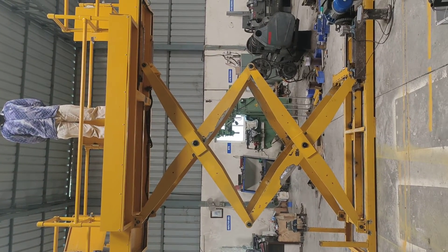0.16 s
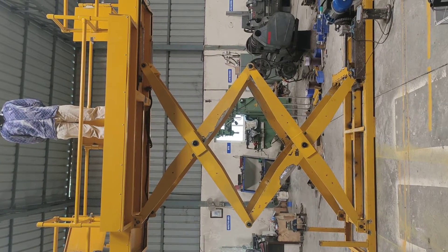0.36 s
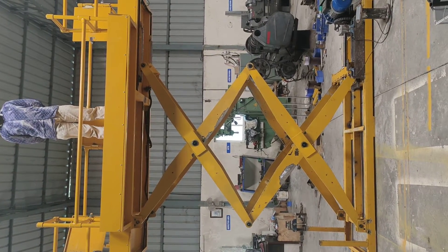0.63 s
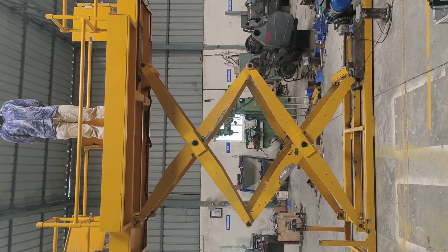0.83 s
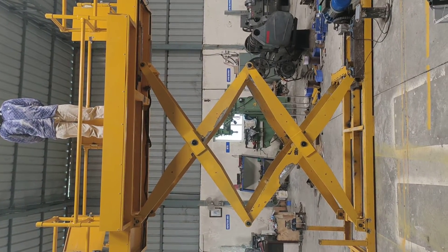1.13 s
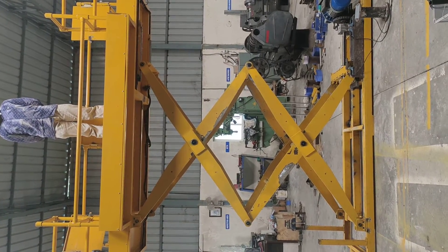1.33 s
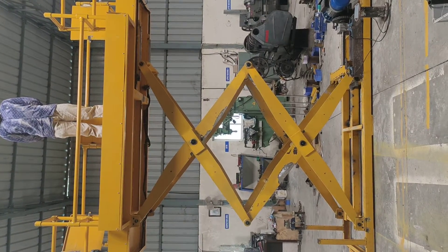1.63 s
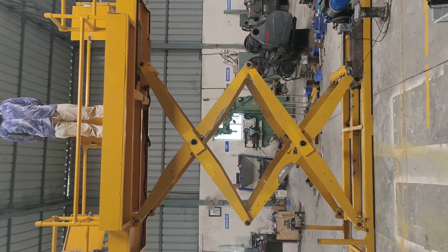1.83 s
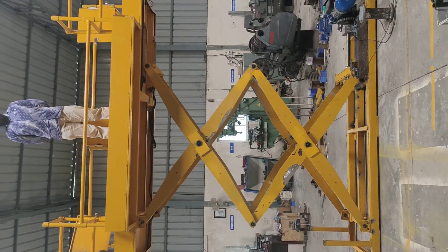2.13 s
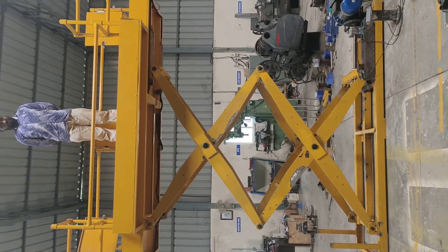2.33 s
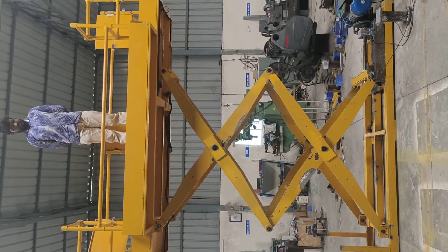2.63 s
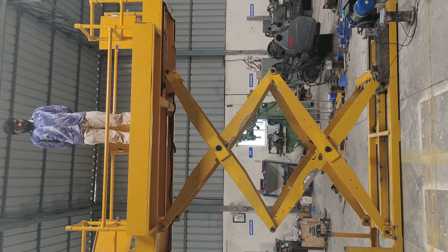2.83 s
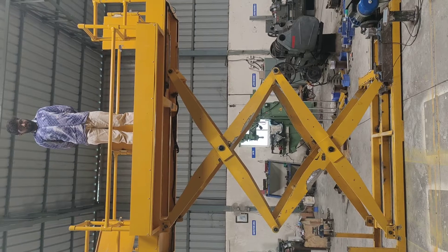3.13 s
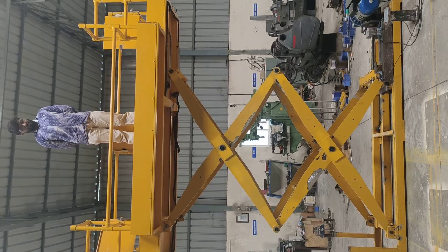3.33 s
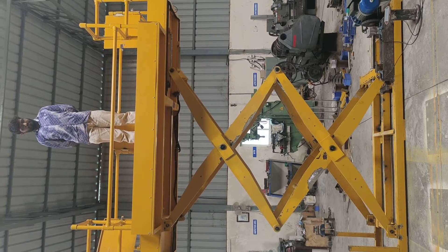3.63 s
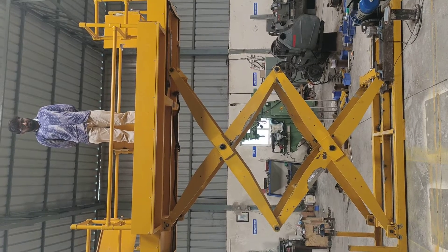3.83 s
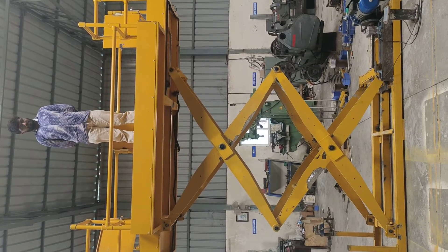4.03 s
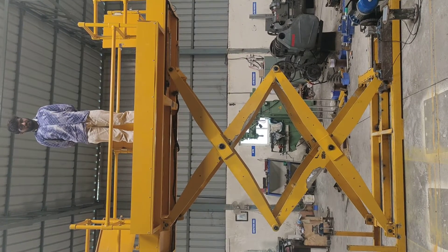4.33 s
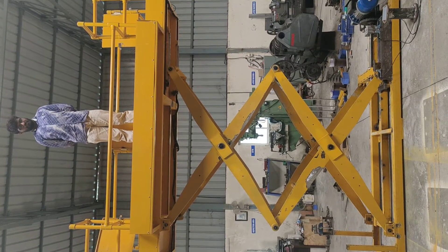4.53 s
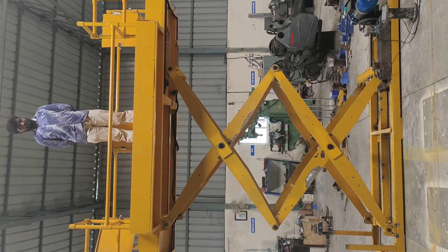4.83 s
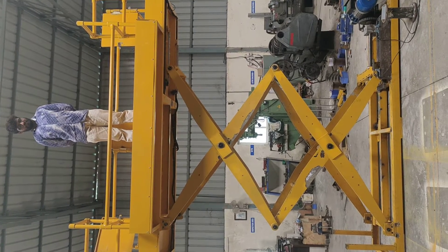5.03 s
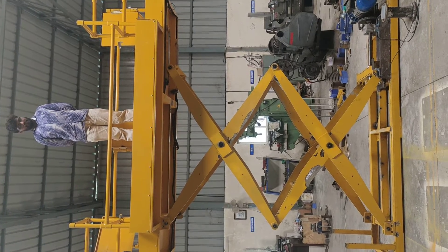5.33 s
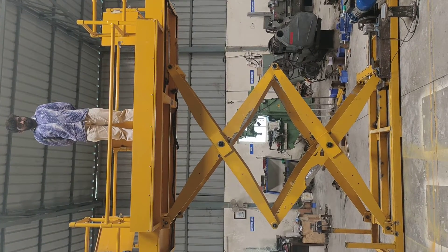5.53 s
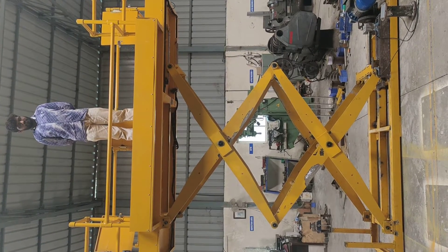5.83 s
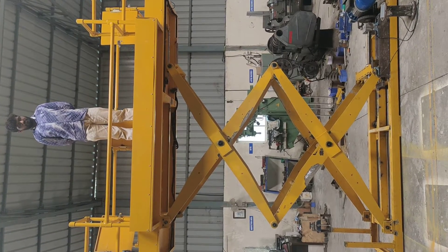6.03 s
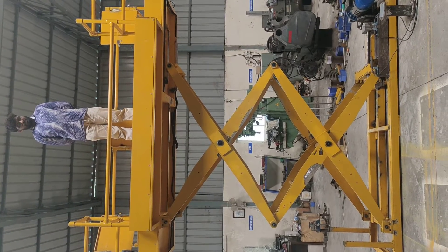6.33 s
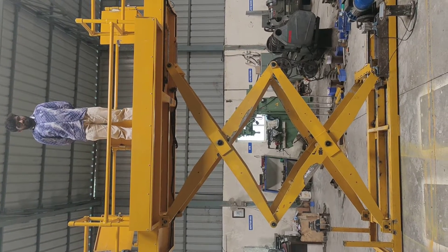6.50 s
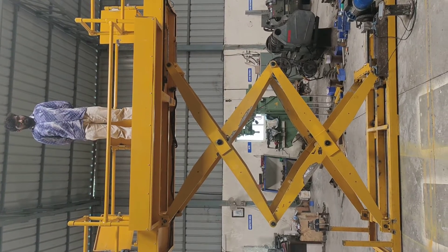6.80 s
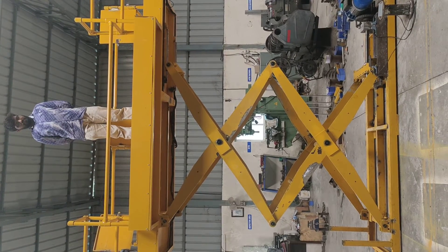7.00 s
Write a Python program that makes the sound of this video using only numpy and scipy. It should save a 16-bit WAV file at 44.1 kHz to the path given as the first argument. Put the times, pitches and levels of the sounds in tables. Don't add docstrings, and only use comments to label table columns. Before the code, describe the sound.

In a large, reverberant steel workshop, distant machinery rumbles softly. After a bit over a second a sharp metallic clack rings through the hall, and an electric motor quickly spins up with a rush of oil. It runs on with a high gear whine over airy hiss. Thin chirps, small joint ticks and dry squeaks come later. Stereo microphone a few metres away.

```python
import sys
import numpy as np
from scipy import signal
from scipy.fft import rfft, irfft, next_fast_len
from scipy.io import wavfile
from scipy.ndimage import uniform_filter1d, map_coordinates

SR = 44100
rng = np.random.default_rng(int(sys.argv[2]) if len(sys.argv) > 2 else 0)


def int16_out(signal):
    q = np.round(np.clip(np.atleast_2d(signal).T, -1, 1) * 32767)
    wavfile.write(sys.argv[1], SR, q.astype(np.int16))


def ratio_of_db(decibels):
    return 10 ** (np.asarray(decibels, float) / 20)


N = 315756
SIZE = next_fast_len(N + 2 * SR)
HZ = np.maximum(np.arange(SIZE // 2 + 1) * SR / SIZE, 1)
TIME = np.arange(N) / SR


def rms_one(x):
    return x / np.sqrt(np.mean(x ** 2) + 1e-20)


def at_hz(points, hz):
    table_hz, values = np.array(points).T
    return np.interp(np.log(hz), np.log(table_hz), values)


def coarse_drift(rate, size=N):
    points = rng.standard_normal(int(size / SR * 400) + 8)
    seconds = np.arange(size // 32 + 2) * 32 / SR
    return map_coordinates(points, [seconds * np.clip(rate, 0, 399) + 2], order=3)


def fine(coarse, size=N):
    return np.interp(np.arange(size) / 32, np.arange(len(coarse)), coarse)


def drift(rate, size=N):
    return fine(coarse_drift(rate, size), size)


def ports(pair):
    # f/Hz, left-right correlation
    likeness = [(60, .996), (130, .985), (210, .94), (330, .7), (560, .22), (1170, -.3), (2740, .42),
                (6400, 0)]
    # f/Hz, left-right level/dB
    port_lean = [(60, 0), (300, -.4), (700, 0), (1290, -2.5), (2380, -5.5), (4400, -4.5), (8120, -2),
                 (15000, -1.5)]
    alike = np.clip(at_hz(likeness, HZ), -1, 1)
    half_db = at_hz(port_lean, HZ) / 2
    mid = np.sqrt(1 + alike) * pair[0]
    side = np.sqrt(1 - alike) * pair[1]
    left, right = (mid + side) * ratio_of_db(half_db), (mid - side) * ratio_of_db(-half_db)
    return irfft(np.array([left, right]), SIZE)[:, :N]


def noise(gain):
    return rms_one(ports(rfft(rng.standard_normal((2, SIZE))) * gain))


def causal(gain):
    cepstrum = irfft(np.log(gain), SIZE)
    cepstrum[1:SIZE // 2] *= 2
    cepstrum[SIZE // 2 + 1:] = 0
    return np.exp(rfft(cepstrum))


def ring(clicks, hz, t60):
    r, w = ratio_of_db(-60 / (t60 * SR)), 2 * np.pi * hz / SR
    return signal.lfilter([0, np.sin(w)], [1, -2 * r * np.cos(w), r * r], clicks + 1e-18)


def far_machines():
    # f/Hz, level/dB per Hz
    rumble_colour = [(20, -46), (64, -2), (130, -8), (175, -5.5), (300, -9.5), (600, -16.5), (880, -16),
                     (1450, -28.5), (2400, -19.5), (3400, -26.5), (4150, -32.5), (4800, -27), (6300, -34.5),
                     (9500, -53.5), (15500, -52.5)]
    return ratio_of_db(-33) * noise(ratio_of_db(at_hz(rumble_colour, HZ)))


def hall_tail(x, build_s):
    # f/Hz, t60/s
    hall_t60 = [(250, 1.09), (700, 1.82), (2000, 1.8), (5000, 2.05), (8000, 1.1), (14000, 0.83)]
    t, tail = np.arange(2 * SR) / SR, 0
    edges = 100 * 2 ** np.arange(0, 7.6, .5)
    white = rng.standard_normal((2, 2, len(t)))
    for k, (low, high) in enumerate(zip(edges, edges[1:])):
        half_octave = signal.butter(2, [low, high], "band", fs=SR, output="sos")
        band = signal.sosfilt(half_octave, white[k % 2])
        tail = tail + band * ratio_of_db(-60 * t / at_hz(hall_t60, np.sqrt(low * high)))
    build_up = 1 - np.exp(-t / build_s)
    return ports(rfft(tail * build_up, SIZE) * rfft(x, SIZE))


def joint_ticks():
    # t/s, peak level/dB, ring f/Hz, width/Hz
    joint_snaps = [
        (3.461, -38, 15000, 2500),
        (3.508, -25, 11500, 9000),
        (3.509, -24, 4800, 450),
        (3.534, -20, 4900, 550),
        (4.851, -25, 14600, 4000),
        (4.977, -29, 14200, 4000),
    ]
    out = np.zeros(N)
    t = np.arange(SR // 20) / SR
    for s, db, hz, width_hz in joint_snaps:
        t60 = 1.6 / width_hz
        burst = rng.standard_normal(len(t)) * np.exp(-t / .0015)
        snap = ring(ring(burst, hz, t60), hz, t60)
        out[round(s * SR):][:len(t)] += ratio_of_db(db) * snap / np.abs(snap).max()
    return out


def slip(row, overtones_db):
    s, length, hz, db, scatter = row
    t = np.arange(round(length * SR)) / SR
    pitch = hz + scatter * (drift(121, len(t)) - 2.5 * t)
    phase = 2 * np.pi * np.cumsum(pitch) / SR
    flutter_db = min(0.46 * scatter, 4.0)
    wave = 0
    for k, partial_db in enumerate(overtones_db):
        rough_loss_db = 0.029 * scatter if k == 0 else 0
        level_db = partial_db - rough_loss_db + flutter_db * drift(61.7, len(t))
        wave = wave + ratio_of_db(level_db) * np.sin((k + 1) * phase)
    shape_db = np.interp(t / length, [0, 0.17, 0.17 + 0.38, 1], [-2, 0, 0, -19])
    fade = np.clip(np.minimum(t, length - t) / 0.023, 0, 1)
    out = np.zeros(N)
    out[round(s * SR):][:len(t)] = wave * fade * ratio_of_db(db + shape_db)
    return out


def dry_pins():
    # t/s, length/s, slip rate f/Hz, peak level/dB, pitch scatter/Hz
    squeal_rows = [
        (4.886, 0.51, 4660, -56, 50),
        (4.998, 0.17, 4680, -52.5, 25),
        (5.068, .24, 4950, -51, 89),
        (5.232, 0.4, 4756, -41, 13.6),
        (5.52, .7, 4745, -51, 32),
        (6.0, .2, 5220, -54, 23),
        (6.09, 0.4, 5010, -47, 26),
        (6.282, .28, 5240, -55, 50),
        (6.35, 0.62, 4680, -55.5, 45),
        (6.498, .27, 4800, -56, 52),
    ]
    partials_db = [5.5, -6, 0.5]
    # t/s, length/s, f/Hz, peak level/dB, pitch scatter/Hz
    chirp_rows = [
        (1.98, .72, 4000, -48.5, 2),
        (2.66, .64, 9810, -58, 40),
        (3.98, .44, 8820, -53, 35),
        (4.08, .36, 8610, -56, 45),
    ]
    squeals = sum(slip(row, partials_db) for row in squeal_rows)
    return squeals + sum(slip(row, [0]) for row in chirp_rows)


def gears(gearbox, whine):
    mesh_rates = [708.3, 2000.1, 2239.6, 2268.2]
    # shaft turns from the mesh, level/dB rms
    mesh_sidebands = [
        [(-1, -42), (0, -41.5), (1, -41.5)],
        [(0, -38.5)],
        [(-16, -53), (-15, -52), (-13, -51), (-11, -51), (-10, -52), (-2, -47), (-1, -42), (0, -38.5), (1, -41),
         (2, -43), (5, -50), (8, -50), (9, -55)],
        [(-27, -54), (-26, -56), (-16, -49), (-13, -53), (-3, -46), (-2, -43), (-1, -46), (0, -34), (1, -35),
         (2, -46), (3, -40), (4, -51), (6, -53)],
    ]
    # left-right level/dB, right lag/rad, growth/dB per s
    mesh_place = [(-9, -1, 0), (6.5, -2.04, 2.5), (-4, -1.5, -0.5), (-3, -0.75, 0)]
    shaft_hz = 39.06
    tones, slow = np.zeros((2, N)), slice(0, N, 32)
    for mesh_hz, sidebands, (pan_db, lag, growth_db) in zip(mesh_rates, mesh_sidebands, mesh_place):
        growth = ratio_of_db(growth_db * (TIME[slow] - TIME[-1]))
        for turns, db in sidebands:
            hz = mesh_hz + turns * shaft_hz
            start, pan, skew = rng.standard_normal(3)
            if hz < 2010:
                level = gearbox[slow] * ratio_of_db(42 if hz < 800 else 38)
            else:
                level = whine[slow] * ratio_of_db(30)
            shared = coarse_drift(7) * min(hz / 2000, 1)
            path = fine(1.2 * coarse_drift(1.2))
            turn = 2 * np.pi * (hz * TIME + start) + path
            turn = (turn % (2 * np.pi)).astype(np.float32)
            for side in (0, 1):
                place_db = (1 - side) * (pan_db + 3 * pan)
                sway = ratio_of_db(db + place_db + 3.0 * shared + 0.61 * coarse_drift(2.93))[:len(level)]
                side_lag = np.float32(side * (lag + 0.46 * skew))
                tones[side] += fine(growth * level * sway) * np.sin(turn + side_lag)
    return tones


def motor():
    # t/s, level/dB
    effort = [(1.55, -29), (1.75, -29), (2.2, -24), (2.602, -26), (3.8, -28.5), (4.1, -26), (4.8, -31.5),
              (5.2, -26.5), (7.16, -26)]
    # f/Hz, level/dB per Hz
    casing_colour = [(300, -14.5), (450, -12.5), (740, -15), (1450, -22), (2030, -13.5), (2290, -11.5),
                     (2600, -13), (3570, -27), (4600, -25.5), (5900, -9), (7000, -27.5), (8300, -30.5),
                     (10500, -49.5), (12500, -40.5)]
    # f/Hz, width/Hz, level/dB
    whistles = [(5200, 20, -60.5), (5690, 38, -45), (5772, 31, -43), (5980, 30, -58), (5660, 18, -63.5),
                (5800, 25, -78), (2266, 132, -40)]
    s, whine_db = np.transpose(effort)
    running = np.maximum(TIME - s[0], 0)
    start = np.clip(running / 0.17, 0, 1)
    whine = start * ratio_of_db(np.interp(TIME, s, whine_db))
    gearbox = start ** 2 * ratio_of_db(-41.5 + 1.5 * running)
    surge_db = 7.5 * np.exp(-running / 0.24)
    hiss = start * ratio_of_db(-38.5 + 0.49 * running + surge_db)
    peaks = 0
    for hz, width_hz, db in whistles:
        peaks = peaks + ratio_of_db(db) ** 2 / width_hz / (1 + (2 * (HZ - hz) / width_hz) ** 4)
    casing = ratio_of_db(5.5) * noise(ratio_of_db(at_hz(casing_colour, HZ))) * ratio_of_db(0.56 * drift(7.9))
    airy = ratio_of_db(2.5) * noise(np.sqrt(peaks)) * ratio_of_db(0.6 * drift(25))
    return gears(gearbox, whine) + hiss * (casing + airy)


def brake():
    # t/s, peak level/dB, weight (extra level of the low modes)/dB
    blows = [
        (1.348, -24, -22),
        (1.3544, -5.5, -32),
        (1.3647, 0, -9.5),
        (1.373, -8.5, 6),
        (1.387, -6, -15),
    ]
    # f/Hz, level/dB, t60/s
    frame_modes = [(320, -43, 0.13), (348.3, 2.5, 0.18), (361, -10.5, 0.2), (451, -5.5, 0.17),
                   (478, -7.5, 0.17), (887, -16, .1), (931, -7, 0.084), (964, -13, 0.1), (1078, -9, 0.07),
                   (1118, -4.5, 0.097), (1140, -25, .1), (1950, -19, 0.12), (2820, -12.5, 0.2),
                   (2660, -21, .1), (3219, -36, .1), (3210, -17, 0.13), (3714, -49, .1),
                   (4080, -11.5, 0.17), (4760, -8, .14), (5130, -14, .12), (5240, -3.5, 0.13),
                   (5360, -5, 0.072), (7600, -3, 0.021)]
    # f/Hz, level/dB per Hz
    crack_colour = [(200, -40), (340, -3), (450, -4.5), (560, -15), (900, -11.5), (1120, -9), (1450, -19.5),
                    (1910, -13.5), (3310, -13), (4350, -18.5), (5170, -7), (6300, -15), (10000, -27),
                    (13500, -22.5)]
    s, db, weight_db = np.transpose(blows)
    at = np.round(s * SR).astype(int)
    burst, click, frame = np.zeros((3, N))
    for start, level in zip(s, ratio_of_db(db)):
        burst += level * (TIME >= start) * np.exp(-np.maximum(TIME - start, 0) / 0.0042)
    click[at[2]] = ratio_of_db(10.5)
    sources = [burst * rng.standard_normal(N), click]
    crack = causal(ratio_of_db(at_hz(crack_colour, HZ)))
    rattle, thump = irfft(rfft(sources, SIZE) * crack, SIZE)[:, :N]
    ringing = slice(at[0], at[0] + SR // 2)
    for hz, mode_db, t60 in frame_modes:
        clicks = np.zeros(N)
        clicks[at] = ratio_of_db(db + mode_db + weight_db * (hz < 600) + rng.normal(0, 2.4, len(at)))
        frame[ringing] += ring(clicks[ringing], hz, min(t60, .16))
    near = ratio_of_db(17.5) * rattle + ratio_of_db(-11.5) * frame
    far = ratio_of_db(24.0) * thump + ratio_of_db(-13.5) * frame
    return near, far


def scene():
    squeals, snaps = dry_pins(), joint_ticks()
    blow, far_blow = brake()
    direct = ratio_of_db(-4.5) * blow + ratio_of_db(3.0) * snaps
    near = np.array([np.roll(direct, 10), direct]) * ratio_of_db([[-1.2], [1.2]])
    pins = ratio_of_db(-1.5) * squeals * ratio_of_db([[1.5], [-1.5]])
    to_hall = ratio_of_db(-32) * far_blow + ratio_of_db(-40.5) * snaps + ratio_of_db(-36.5) * squeals
    return near + pins + hall_tail(to_hall, build_s=0.002) + motor() + far_machines()


def band_limit(x):
    return signal.sosfilt(signal.butter(12, 15700, fs=SR, output="sos"), x)


def record(dry):
    level_db = 10 * np.log10(uniform_filter1d(np.mean(dry ** 2, axis=0), 1024) + 1e-12)
    release_db = 6.8 * TIME
    held_db = np.maximum.accumulate(level_db + release_db) - release_db
    duck_db = -.4 * np.maximum(held_db + 18.5, 0)
    gain_db = signal.lfilter([.002], [1, -.998], duck_db)
    return band_limit(np.tanh(dry * ratio_of_db(gain_db)))


dry = scene()
out = record(dry)
int16_out(out)
```